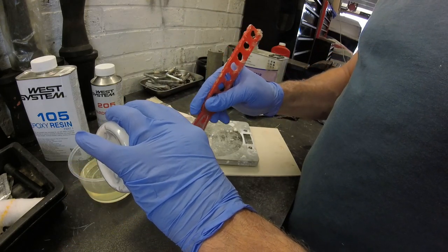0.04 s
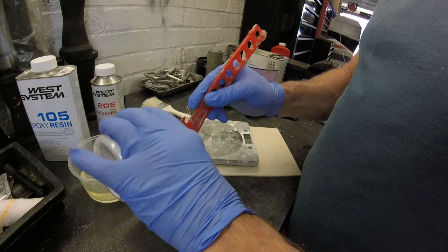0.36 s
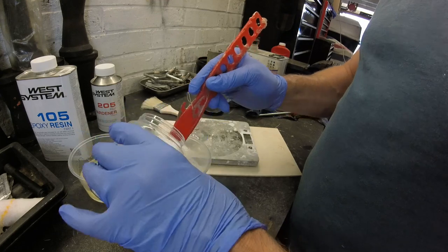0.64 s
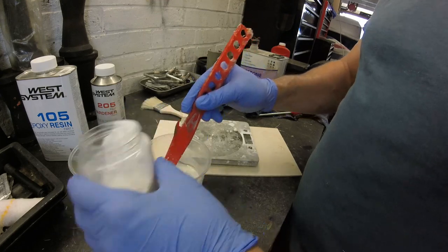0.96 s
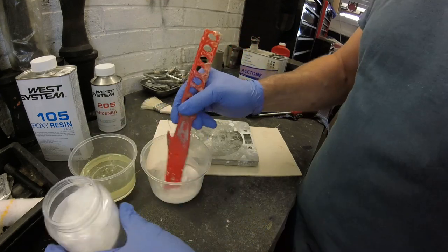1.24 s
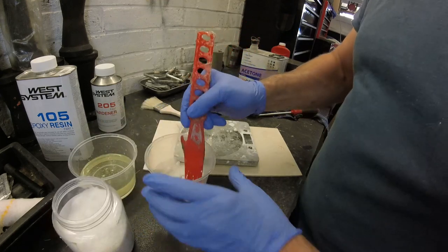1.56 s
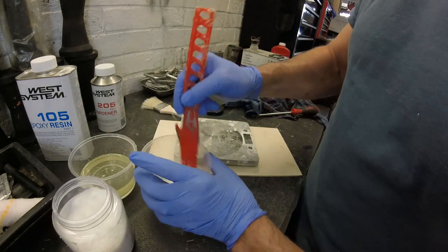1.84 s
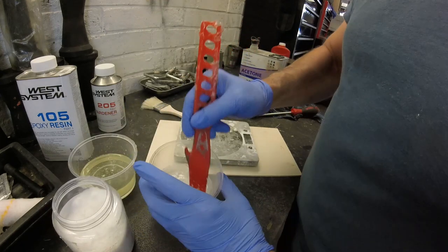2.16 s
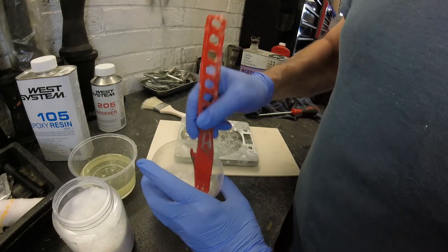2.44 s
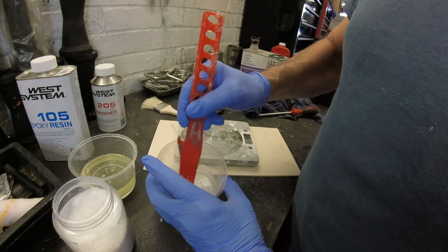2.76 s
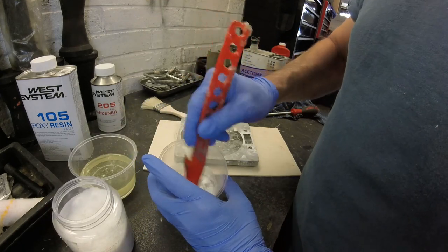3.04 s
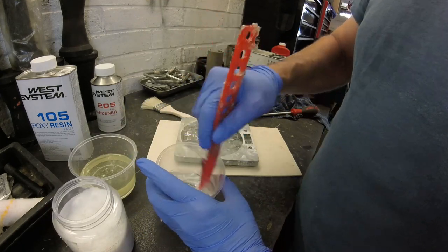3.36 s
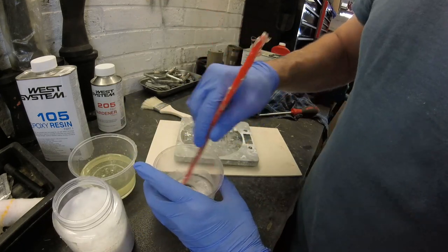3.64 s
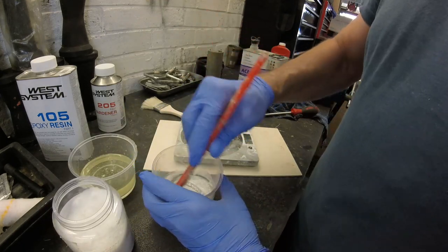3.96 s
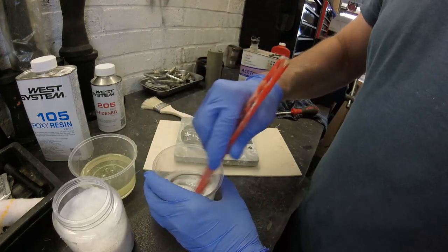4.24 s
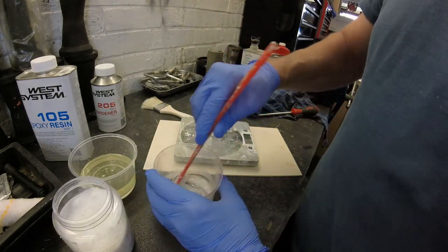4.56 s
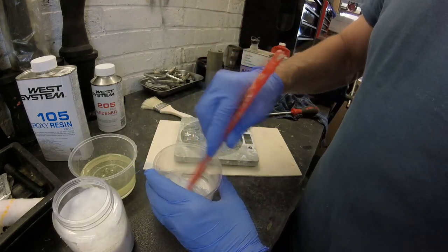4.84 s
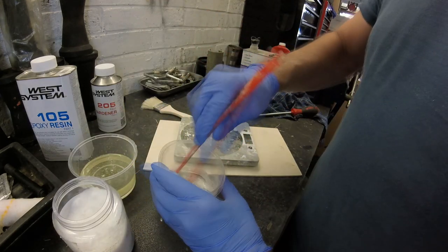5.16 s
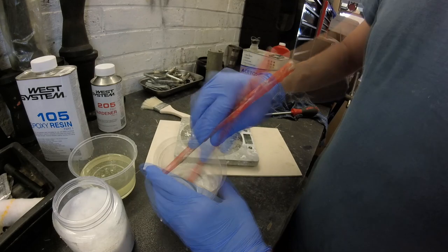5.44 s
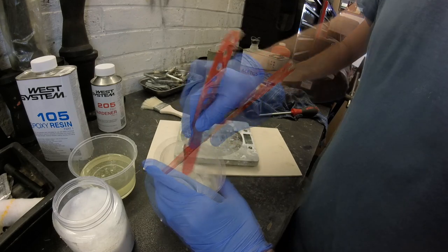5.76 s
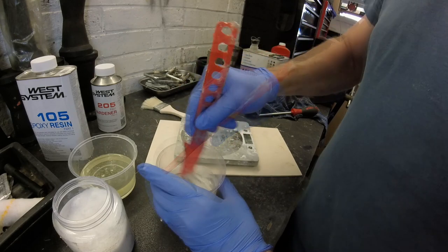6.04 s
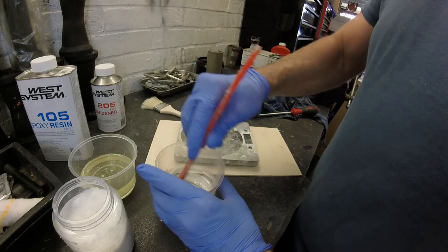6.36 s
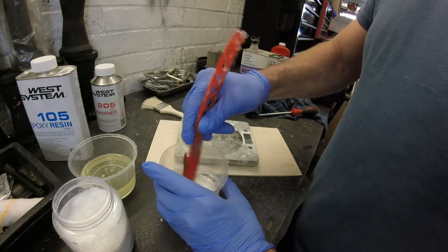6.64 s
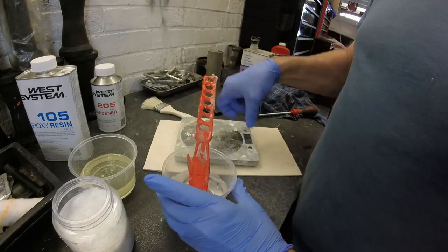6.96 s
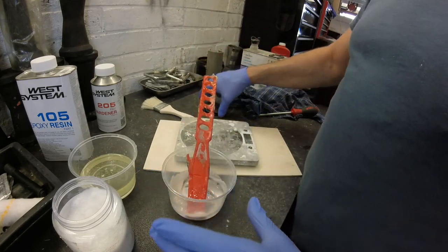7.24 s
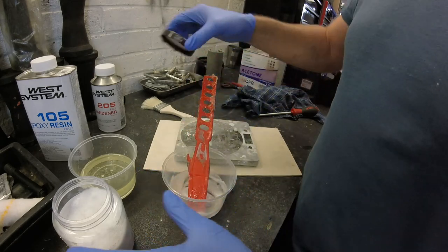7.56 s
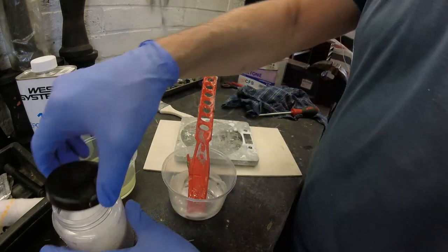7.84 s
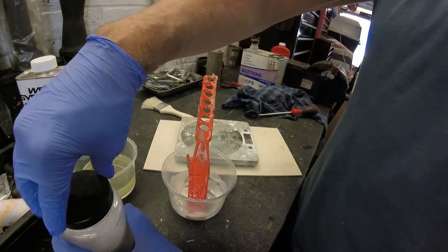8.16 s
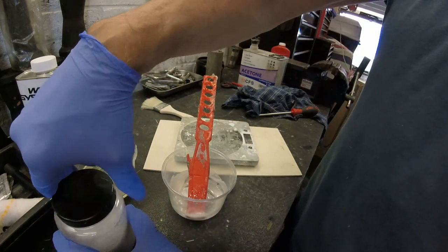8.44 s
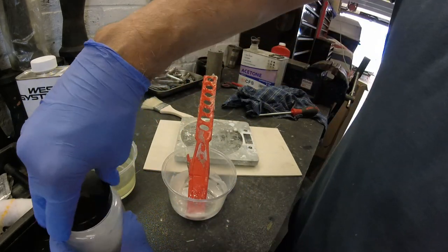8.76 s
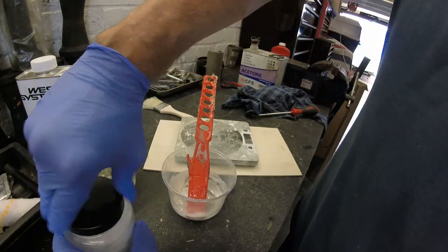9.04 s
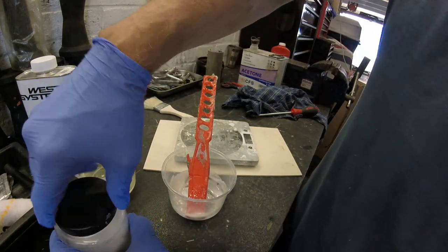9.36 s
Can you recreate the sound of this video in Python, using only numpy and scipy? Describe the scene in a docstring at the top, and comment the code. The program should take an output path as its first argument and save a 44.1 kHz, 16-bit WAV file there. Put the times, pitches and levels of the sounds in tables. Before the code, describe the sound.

Close up in a quiet, faintly humming workshop, hollow taps on a plastic jar give way to a louder knock as it lands on the bench. For about five seconds a plastic stick clicks, drags and thuds around a cup of sticky paste, with the sound cutting out for an instant midway. The stick falls on the rim with a double tap. Then a plastic lid is twisted onto the jar with gritty rubs and one sharp snap.

```python
"""A plastic stick stirs thick epoxy: it drags round a thin cup, clicks on the wall and shakes the bench.
Before that, a plastic jar of filler is tapped over the cup and set down, rocking. Afterwards the stick
topples against the rim, and the jar's lid is put on and spun until its thread drops in.
Each knock makes the plastic ring briefly; each rub is a stream of tiny slips. It is all heard close up,
in a quiet workshop with a low hum and a faint whistle. Midway the sound cuts out for an instant."""
import sys
import numpy as np
from scipy import signal
from scipy.fft import rfft, irfft, next_fast_len
from scipy.io import wavfile
from scipy.ndimage import map_coordinates

SR = 44100
rng = np.random.default_rng(int(sys.argv[2]) if len(sys.argv) > 2 else 0)


def generate_wav(sig):
    """Save sig (samples, or channels by samples) to the path in sys.argv[1] as 16-bit PCM at SR."""
    pcm = np.round(np.clip(np.atleast_2d(sig).T, -1, 1) * 32767).astype(np.int16)
    wavfile.write(sys.argv[1], SR, pcm)


N = 423360

# The cup's ringing tones. Each row: pitch in Hz, relative level in dB, seconds to fade by 60 dB.
CUP_TONES = [(170, -11, 0.029), (276, -9.5, 0.033), (350.4, -1.5, 0.038), (412, 0.5, 0.014),
             (680, -3.5, 0.0093), (777, -4, 0.018), (966, -1, 0.018), (1089, -3, 0.0088),
             (1790, 3.5, 0.005), (2240, 0, 0.017), (2599, 0.5, 0.0078), (3700, -7.5, 0.0089),
             (4780, -17, 0.008)]
# The stick hits the wall; the row at 2.29 s is the cup itself knocked on the bench. Each row: start in seconds,
# relative level in dB, hardness in dB.
WALL_CLICKS = [(1.955, -28, -15), (2.093, -23.5, -0.5), (2.29, -16.3, -0.5), (2.648, -28.5, -1),
               (2.825, -19, 0.5), (3.065, -29, 4.5), (3.239, -24.5, -5.5), (3.267, -28, -9),
               (3.284, -30.5, 8), (3.301, -37.5, 12.5), (3.438, -33.5, -3), (3.491, -32, -5.5),
               (3.654, -21, -2), (3.883, -34, -2), (3.911, -35, 3), (4.01, -27, -4), (4.038, -34, 2),
               (4.221, -30, 2), (4.236, -35, 11.5), (4.476, -24.5, 2), (4.534, -27.5, -5),
               (4.629, -24.5, 7.5), (4.679, -32, 4.5), (4.735, -33, -12), (5.063, -21.5, 9),
               (5.236, -29, 0), (5.33, -37.5, 7), (5.559, -33, -5), (5.671, -38, 14.5), (5.718, -26, 3),
               (5.789, -16, -5), (6.096, -22.5, -2.5), (6.127, -17.5, -5.5), (6.202, -38, 16),
               (6.423, -20, 9), (6.548, -29.5, -5), (6.658, -20.5, 9), (6.773, -32.5, 1.5),
               (6.807, -29.5, -7)]
# The stick is pushed onto the cup's floor; the row at 2.29 s is the cup itself knocked on the bench. Each row:
# start in seconds, relative level in dB.
FLOOR_THUDS = [(2.29, -27.5), (3.034, -35.5), (3.19, -40), (3.654, -36), (3.811, -39), (4.064, -32.5),
               (4.341, -39.5), (4.505, -36), (4.537, -31), (4.629, -37), (4.735, -36), (4.955, -37),
               (5.121, -42), (6.178, -35.5), (6.291, -35.5), (6.378, -38), (6.707, -36), (6.941, -37.5)]
# The stick falls on the rim. Each row: start in seconds, relative level in dB, hardness in dB.
RIM_KNOCKS = [(7.057, -19.5, -1), (7.098, -18.5, 0.5)]
def stick():
    """The stick rings the cup: it clicks on the wall, thuds on the floor and topples against the rim; once, at
    2.29 s, the cup itself is knocked on the bench."""
    clicks = knocks(WALL_CLICKS + grazes(), CUP_TONES, body_db=-16, body_give=0.27, wall_db=-9,
                    edge_db=-21.5, tick_db=-41.5, tick_s=0.024, scuff_db=-9.5, scuff_s=0.028,
                    clutter_db=-3, clutter_s=0.12, delay_s=0.00149)
    thuds = knocks([(s, db, 0) for s, db in FLOOR_THUDS], CUP_TONES, body_db=-0.5, body_give=0,
                   wall_db=-6, edge_db=-24, tick_db=-42, tick_s=0.028, scuff_db=-8, scuff_s=0.027,
                   clutter_db=-3, clutter_s=0.09, delay_s=0.00163)
    topple = knocks(RIM_KNOCKS, CUP_TONES, body_db=-17.5, body_give=0.4, wall_db=-7.5,
                    edge_db=-22.5, tick_db=-34.5, tick_s=0.014, scuff_db=-8.5, scuff_s=0.035,
                    clutter_db=-5, clutter_s=0.13, delay_s=0.00104, tuning=0.943)
    return amp(-0.5) * (clicks + thuds + topple)


def grazes(most_per_s=4, usual_db=-39.5, spread_db=3.5):
    """Extra rows of wall clicks: light chance touches, more of them the harder the stirring."""
    times = np.flatnonzero(rng.random(N) < most_per_s * stirring_effort() / SR) / SR
    offsets_db = spread_db * rng.standard_normal((len(times), 2))
    return [(s, usual_db + louder, harder) for s, (louder, harder) in zip(times, offsets_db)]


# How hard the hand stirs. Each row: time in seconds, effort from 0 to 1.
EFFORT = [(1.55, 0.17), (1.7, 0.47), (3.0, .45), (3.3, 0.6), (4.1, 1), (4.7, .9), (5.0, 0.27), (5.6, 0.3),
          (6.2, 1), (6.75, 1), (7.2, 0.3)]
def stirring_effort():
    """The hand's effort at every sample, 0 before and after the stirring."""
    return np.interp(np.arange(N) / SR, *np.transpose(EFFORT), left=0, right=0)


# Longer scrapes on the wall. Each row: middle in seconds, length in seconds, relative level in dB.
SCRAPES = [(1.721, 0.081, -43), (1.99, 0.07, -42.5), (2.486, 0.031, -45), (3.846, 0.019, -42),
           (4.154, 0.044, -45.5), (4.774, 0.014, -43), (4.844, 0.03, -45.5), (5.441, 0.016, -48),
           (5.64, 0.026, -44), (5.951, 0.055, -43.5)]
# The tone of the low drag, the sticky smear and a high hiss. Each row: frequency in Hz, boost in dB.
DRAG_SPECTRUM = [(100, 6.5), (200, -3.5), (340, 12.5), (540, -3), (800, 1.5), (1000, 5.5), (1300, -10),
                 (2000, -46)]
SMEAR_SPECTRUM = [(900, -30), (1500, -7), (2250, 6), (2800, -2.5), (4000, -11.5), (6000, -21), (9000, -21),
                  (15000, -44)]
HISS_SPECTRUM = [(2500, -37), (5000, 5), (8500, 6), (12000, -2), (15000, -16)]
def stirring():
    """The stick drags on the cup wall while the sticky paste smears and crackles round it."""
    t = np.arange(N) / SR
    effort = stirring_effort()
    pressure = amp(-57.5) * effort + amp(-16) * pushes(FLOOR_THUDS)
    for middle, length, db in SCRAPES:
        pressure += amp(db) * np.exp(-(2 * (t - middle) / length) ** 4)  # a flat-topped swell
    pressure *= amp(3.5 * wobble(45))  # it sticks and slips
    drag = coloured(friction(slips_per_s=300, spread_db=3, smooth=0.5), DRAG_SPECTRUM)
    smear = coloured(friction(slips_per_s=300, spread_db=3.5, smooth=0.8), SMEAR_SPECTRUM)
    # small air pockets snap open while the paste is beaten fast
    beating = effort ** 2 * amp(0.62 * wobble(14))
    pockets = friction(slips_per_s=90, spread_db=3, smooth=0)
    snaps = signal.fftconvolve(pockets, burst(t[:SR // 50], fade_s=0.008))[:N]
    crackle = amp(-70.5) * coloured(snaps, SMEAR_SPECTRUM) + amp(-77) * coloured(snaps, HISS_SPECTRUM)
    return pressure * (amp(-2.5) * drag + amp(-15) * smear) + beating * crackle


# The jar's ringing tones, damped by the hand and then standing on the bench.
# Each row: pitch in Hz, relative level in dB, seconds to fade by 60 dB.
HELD_JAR_TONES = [(151, -6, 0.0094), (247, 2.5, 0.012), (293, 1.5, 0.024), (389, 0, 0.018), (558, 0, 0.02),
                  (680, 0, 0.0073), (1690, 10, 0.019), (2210, 2, 0.053), (2900, 3, .012)]
STANDING_JAR_TONES = [(170, -12.5, 0.032), (276, 1, 0.023), (324, 3, 0.051), (439, 0, 0.012),
                      (763, 5, 0.017), (1050, -2, 0.015), (2370, 0, 0.011), (2550, -1.5, 0.028),
                      (3220, -3, 0.0061)]
# The taps, with a quick run of small knocks at 0.71 to 0.74 s that makes a short scuff, then the landing. Each
# row: start in seconds, relative level in dB, hardness in dB.
JAR_TAPS = [(0.086, -14.5, -3), (0.278, -10.5, -1.5), (0.497, -20, -8.5), (0.574, -38, 13),
            (0.707, -34, 10), (0.72, -29, 3), (0.736, -32.5, 7.5), (0.88, -41.5, 5)]
JAR_LANDING = [(1.423, -5.5, 2), (1.494, -11, -5), (1.503, -17, 2), (1.562, -14, -2.5), (1.635, -30, 14)]
def jar():
    """The jar rings as it is tapped to shake out powder and scuffs briefly, then lands and rocks on the bench."""
    taps = knocks(JAR_TAPS, HELD_JAR_TONES, body_db=-5, body_give=0.34, wall_db=-24.5,
                  edge_db=-32.5, tick_db=-65, tick_s=0.026, scuff_db=-4, scuff_s=0.067,
                  clutter_db=-24, clutter_s=0.42, delay_s=0.0028)
    landing = knocks(JAR_LANDING, STANDING_JAR_TONES, body_db=-5, body_give=0.23, wall_db=-23.5,
                     edge_db=-30.5, tick_db=-48.5, tick_s=0.045, scuff_db=-5.5, scuff_s=0.07,
                     clutter_db=-8.5, clutter_s=0.34, delay_s=0.003)
    return amp(-0.5) * taps + amp(-2) * landing


# The lid's ringing tones. Each row: pitch in Hz, relative level in dB, seconds to fade by 60 dB.
LID_TONES = [(162, -13, 0.03), (311, -5.5, 0.02), (365, -3.5, 0.026), (440, -4.5, 0.022), (650, -6, 0.02),
             (814, 1.5, 0.011), (1034, -6, 0.03), (1740, 2.5, 0.0053), (2420, -5.5, 0.02),
             (2790, -4.5, 0.015), (3670, -8.5, 0.0097), (4830, -20, 0.021)]
# The lid's knocks. Each row: start in seconds, relative level in dB, hardness in dB.
LID_KNOCKS = [(7.464, -40.5, 10.5), (8.075, -48, 17), (8.118, -32.5, -9), (8.13, -31.5, 7.5),
              (8.16, -38.5, 7.5), (8.264, -28.5, 2.5), (8.376, -30.5, 3), (8.414, -30, 2),
              (8.713, -24.5, -8.5), (8.726, -29, -4), (9.1, -9.5, -4.5), (9.542, -40.5, 2)]
# Dull thuds of the palm on the lid. Each row: start in seconds, relative level in dB.
PALM_PRESSES = [(8.057, -43), (8.076, -34.5), (8.089, -37.5), (8.12, -36.5)]
def lid():
    """The lid is picked up, knocks on the jar's neck, is pressed down and snaps into the thread."""
    knocking = knocks(LID_KNOCKS, LID_TONES, body_db=-14, body_give=0.089, wall_db=-13.5,
                      edge_db=-21, tick_db=-36, tick_s=0.045, scuff_db=-9.5, scuff_s=0.074,
                      clutter_db=-10.5, clutter_s=0.22, delay_s=0.0015)
    pressing = knocks([(s, db, 0) for s, db in PALM_PRESSES], LID_TONES, body_db=-6, body_give=0,
                      wall_db=-28, edge_db=-22, tick_db=-55, tick_s=0.03, scuff_db=-11, scuff_s=0.032,
                      clutter_db=0.5, clutter_s=0.28, delay_s=0.00141)
    return amp(3.5) * (knocking + pressing)


# Fingers spin the lid. Each row: start in seconds, end in seconds, relative level in dB.
TWISTS = [(8.093, 8.32, -56), (8.23, 8.282, -53), (8.385, 8.445, -51), (8.44, 8.535, -54.5),
          (8.773, 8.949, -49.5), (8.934, 9.109, -51.5), (9.175, 9.4, -46.5), (9.224, 9.262, -46.5),
          (9.396, 9.467, -55)]
# The tone of the rubbing thread. Each row: frequency in Hz at the usual grip, boost in dB.
THREAD_SPECTRUM = [(150, 4.5), (480, 9), (680, 4), (800, 7.5), (1070, 11.5), (1400, -3.5), (2100, -2),
                   (2900, 4), (4200, -5.5), (4850, -7), (5800, -12.5), (12000, -20)]
# The jar's hollow ring as the grip shifts. Each row: time in seconds, pitch in Hz.
GRIP_PITCH = [(8.78, 1075), (8.936, 1054), (9.048, 921), (9.172, 932), (9.216, 1105), (9.31, 975.4),
              (9.48, 970)]
def thread(usual_ring_hz=1022, usual_rub_db=-49):
    """At each twist the lid rubs along the jar's gritty thread; stronger twists hiss much more."""
    t = np.arange(N) / SR
    rub = coloured(friction(slips_per_s=1800, spread_db=3, smooth=0.9), THREAD_SPECTRUM)
    ring_hz = np.interp(t, *np.transpose(GRIP_PITCH))
    rub = map_coordinates(rub, [np.cumsum(ring_hz / usual_ring_hz)], mode="mirror")  # bends the pitch
    hiss = coloured(friction(slips_per_s=1400, spread_db=3.5, smooth=0.8), HISS_SPECTRUM)
    out = np.zeros(N)
    for start, end, rub_db in TWISTS:
        hiss_db = -62.5 + 1.9 * (rub_db - usual_rub_db)
        progress = np.clip((t - start) / (end - start), 0, 1)
        speed = (4 * progress * (1 - progress)) ** 0.3  # starts and stops abruptly
        out += speed * (amp(rub_db + 3.5) * rub + amp(hiss_db) * hiss)
    return out * amp(0.9 * wobble(60))


# Hands and containers bump the bench. Each row: start in seconds, level in dB, pitch in Hz.
BUMPS = [(0.058, -24, 170), (0.352, -31.5, 114), (0.698, -30, 103), (1.613, -28.5, 128), (1.682, -27, 84.6),
         (1.835, -38, 100), (3.632, -35, 63), (3.841, -37, 129), (4.024, -34.5, 73), (5.11, -33, 67),
         (6.18, -33, 114), (6.422, -30, 68.4), (6.661, -30, 68)]
# The tone of the bench's rumble. Each row: frequency in Hz, boost in dB.
BENCH_SPECTRUM = [(20, -21), (40, -3.5), (52, -12), (65, 4.5), (85, -2.5), (125, -9.5), (175, -8.5),
                  (300, -38), (600, -76)]
def bench(resting_hands_db=-56):
    """Pushing hands make the bench top rumble; each bump swings it for a few cycles."""
    shake = amp(resting_hands_db) + amp(-17) * pushes(FLOOR_THUDS) + amp(-16) * pushes(BUMPS)
    out = shake * coloured(rng.standard_normal(N), BENCH_SPECTRUM)
    t = np.arange(SR // 4) / SR
    for start, db, hz in BUMPS:
        add(out, start, amp(db) * np.sin(2 * np.pi * hz * t) * fading(t, fade_s=9 / hz))
    return out


# How long the room echoes. Each row: frequency in Hz, seconds to fade by 60 dB.
ECHO_FADES = [(150, 0.18), (600, 0.16), (2500, 0.15), (10000, 0.19)]
def room(sound):
    """The short echo of a crowded brick workshop, arriving 10 ms late."""
    hz, t, noise = signal.stft(rng.standard_normal(SR // 2), SR, nperseg=256)
    _, tail = signal.istft(noise * fading(t, along(ECHO_FADES, hz)[:, None]), SR, nperseg=256)
    tail = np.pad(tail / np.linalg.norm(tail), (SR // 100, 0))
    return signal.fftconvolve(sound, tail)[:N]


# The tone of the room's steady noise. Each row: frequency in Hz, boost in dB.
AIR_SPECTRUM = [(12, -53), (20, -12.5), (64, -4), (119, -18.5), (245, -13), (416, -17.5), (565, -17.5),
                (705, -21.5), (932, -18.5), (1040, -20.5), (1340, -26), (2210, -27.5), (4070, -33.5),
                (14300, -51), (15500, -71)]
def background():
    """Workshop air, a wavering low hum and a faint whistle that holds, then falls and fades."""
    t = np.arange(N) / SR
    air = amp(-53) * coloured(rng.standard_normal(N), AIR_SPECTRUM)
    hum_gain = amp(-57.5 + 2 * wobble(8))
    hum_hz = 64 + 2 * wobble(6)
    hum = hum_gain * np.sin(2 * np.pi * np.cumsum(hum_hz) / SR)
    whistle_hz = 3500 - 220 * np.maximum(t - 0.81, 0)
    whistle_gain = amp(-75.5) * np.clip((4.1 - t) / 0.8, 0, 1)  # gone at 4.1 seconds
    phase = 2 * np.pi * np.cumsum(whistle_hz) / SR
    whistle = whistle_gain * (wobble(150) * np.sin(phase) + wobble(150) * np.cos(phase))
    return air + hum + whistle


# The tone of the tick where two things touch. Each row: frequency in Hz, boost in dB.
TICK_SPECTRUM = [(2500, -14), (4000, 11), (4900, 10), (5800, 8.5), (8800, 6.5), (11000, -2), (15000, -7)]
def knocks(rows, tones, body_db, body_give, wall_db, edge_db, tick_db, tick_s,
           scuff_db, scuff_s, clutter_db, clutter_s, delay_s, tuning=1):
    """Each knock rings a plastic container's hollow body, wall and stiff edge, and adds a tick."""
    out, t = np.zeros(N), np.arange(SR // 5) / SR
    hz, tone_db, fade_s = np.transpose(tones)
    family = np.digitize(hz, [590, 1500])  # split in Hz: body low, wall between, edge high
    signs = (-1) ** np.arange(len(hz))
    for start, level_db, hardness_db in rows:
        # the place of contact changes the pitch and strength of every tone
        pitch = tuning * hz * np.exp(0.03 * rng.standard_normal(len(hz)))
        gain = signs * amp(tone_db + 2 * rng.standard_normal(len(hz)))
        rings = gain[:, None] * np.sin(2 * np.pi * pitch[:, None] * t) * fading(t, fade_s[:, None])
        tick = coloured(rng.standard_normal(len(t)), TICK_SPECTRUM) * fading(t, tick_s)
        parts = np.array([rings[family == k].sum(axis=0) for k in range(3)] + [tick])
        # a strong blow is one clean push, a light one scuffs along; things on the bench scatter both
        scuff = amp(scuff_db - 0.5 * (level_db + 18.5)) * burst(t, scuff_s)
        clutter = amp(clutter_db) * burst(t, clutter_s)
        scattered = signal.fftconvolve(parts, (scuff + clutter)[None], axes=1)[:, :len(t)]
        parts += amp([0, 1.5, 2.5, 6])[:, None] * scattered  # more for the higher parts
        # the soft body gives way in a strong blow; a harder contact is shorter, so it sounds brighter
        force_db = level_db + 25  # how far above a middling knock
        hollow_db = body_db - body_give * force_db - 0.14 * hardness_db
        snap_db = tick_db + hardness_db + 0.13 * force_db
        strengths = amp(level_db + np.array([hollow_db, wall_db, edge_db + hardness_db, snap_db]))
        opening_levels = np.sqrt(np.mean(parts[:, :SR // 100] ** 2, axis=1))  # the first 10 ms
        add(out, start + delay_s, (strengths / opening_levels) @ parts)
    return out


def friction(slips_per_s, spread_db, smooth):
    """Tiny slips of uneven size over a smooth rubbing noise."""
    slips = (rng.random(N) < slips_per_s / SR) * rng.choice([-1, 1], N)
    sizes = amp(spread_db * np.minimum(rng.exponential(size=N), 3))
    return unit(slips * sizes) + smooth * rng.standard_normal(N)


def pushes(rows, rise_s=0.016, fall_s=0.071):
    """A gain that builds up to each push of the hand and dies away after it."""
    t = np.arange(N) / SR
    return sum(amp(db) * np.exp(-np.maximum((s - t) / rise_s, (t - s) / fall_s).clip(0, 20))
               for s, db, *_ in rows)


def amp(db):
    """Turn decibels into a gain."""
    return 10 ** (np.asarray(db) / 20)


def unit(sound):
    """Scale a sound to an average (rms) level of 1."""
    return sound / np.sqrt(np.mean(sound ** 2) + 1e-20)


def along(points, hz):
    """Read between a table's rows on a log frequency scale."""
    row_hz, values = np.transpose(points)
    return np.interp(np.log(hz + 1), np.log(row_hz + 1), values)


def wobble(per_s):
    """A smooth curve through per_s random values a second."""
    return map_coordinates(rng.standard_normal(int(N * per_s / SR) + 4), [np.arange(N) * per_s / SR])


def coloured(sound, spectrum):
    """Give a sound the tone of a spectrum table, at an average level of 1."""
    size = next_fast_len(len(sound) + 8192)
    gains = amp(along(spectrum, np.fft.rfftfreq(size, 1 / SR)))
    return unit(irfft(rfft(sound, size) * gains, size)[:len(sound)])


def add(track, start, sound):
    """Mix a sound into a track at a start time in seconds."""
    part = track[max(round(start * SR), 0):][:len(sound)]
    part += sound[:len(part)]


def fading(t, fade_s):
    """A fade that is 60 dB down after fade_s seconds."""
    return np.exp(-np.log(1000) * t / fade_s)


def burst(t, fade_s):
    """Dying noise with a total energy of 1."""
    noise = rng.standard_normal(len(t)) * fading(t, fade_s)
    return noise / np.linalg.norm(noise)


def scene():
    """Everything on the bench, in the room, as one channel."""
    handling = stick() + jar() + lid() + stirring() + thread()
    return (handling + amp(-13.5) * room(handling) + bench() + background())[None]


def record(dry, top_hz=15400):
    """The sound cuts out for about 40 ms, and everything above top_hz is removed."""
    t = np.arange(N) / SR
    gated = dry * ((t < 5.5087) | (t > 5.5485))
    size = next_fast_len(N + 8192)
    kept = np.fft.rfftfreq(size, 1 / SR) < top_hz
    return irfft(rfft(gated, size) * kept, size)[:, :N]


dry = scene()
out = record(dry)
generate_wav(out)
```